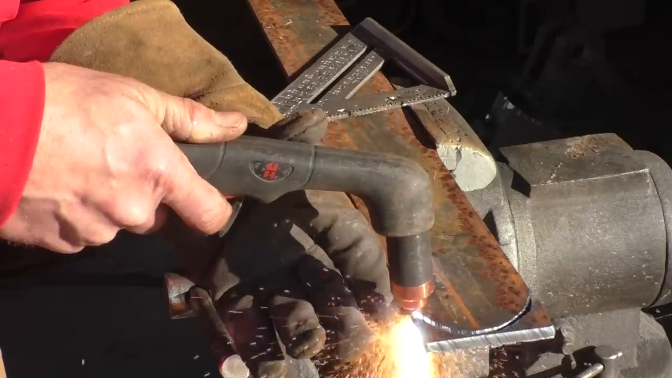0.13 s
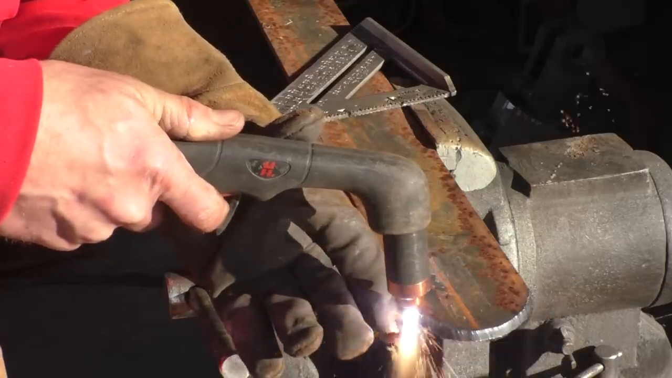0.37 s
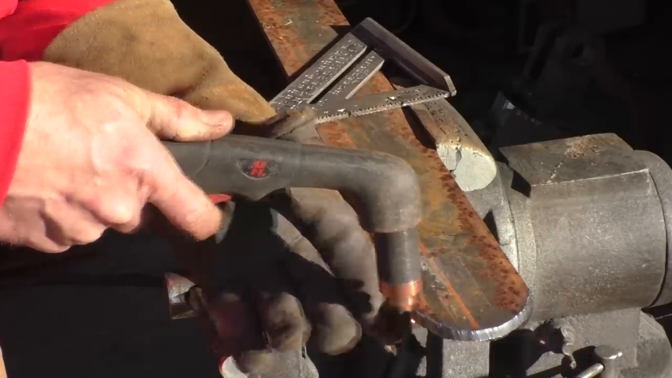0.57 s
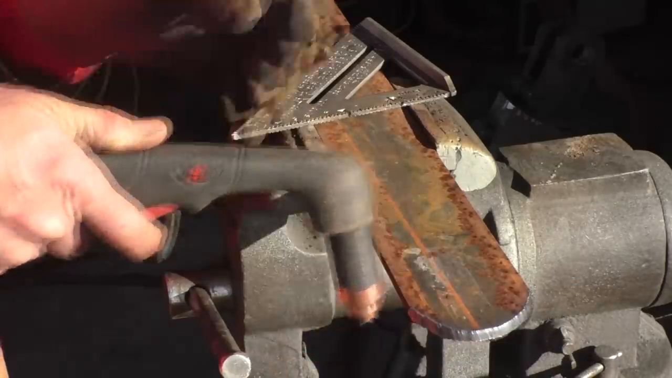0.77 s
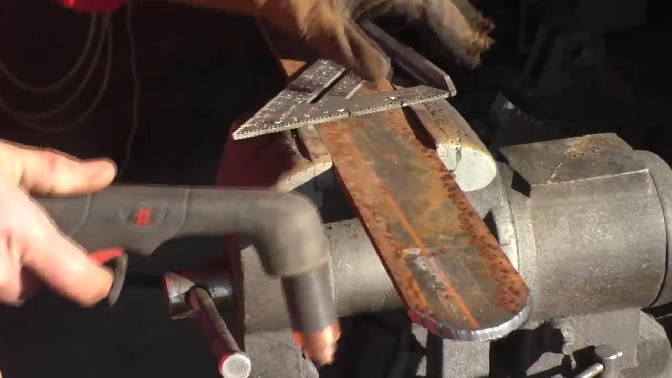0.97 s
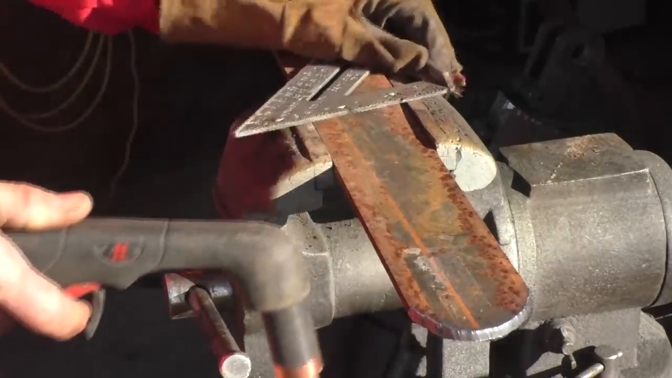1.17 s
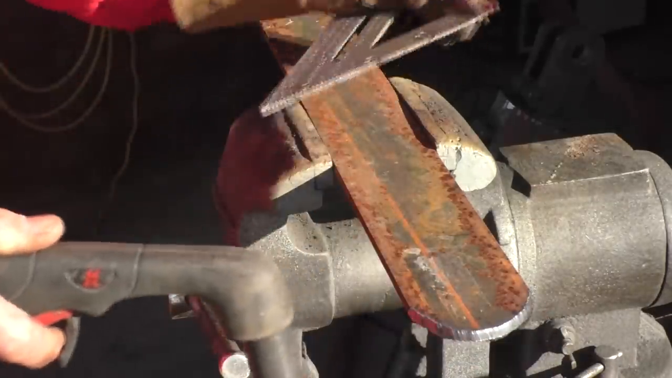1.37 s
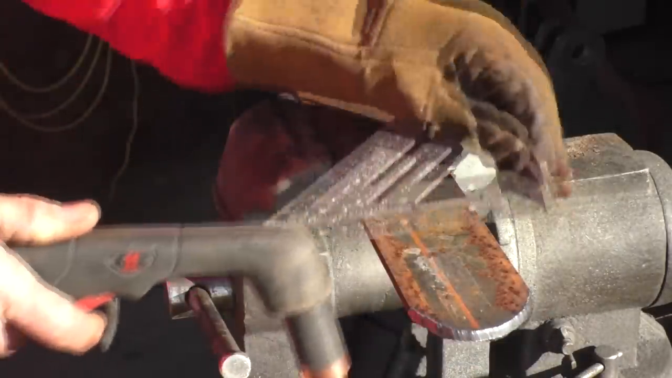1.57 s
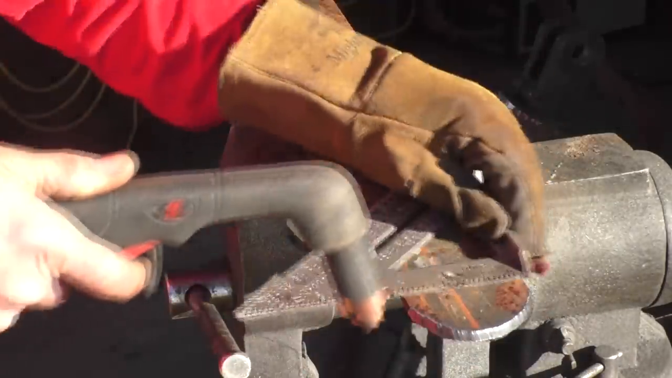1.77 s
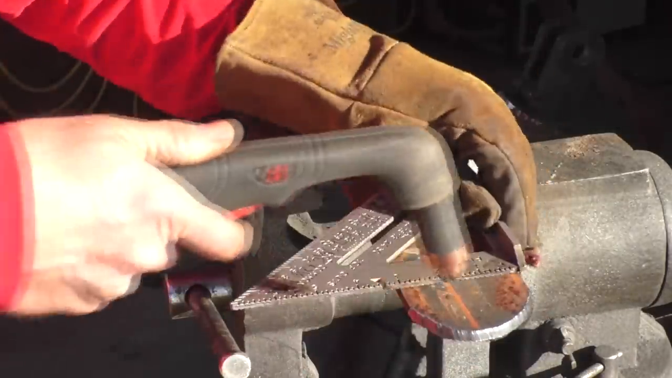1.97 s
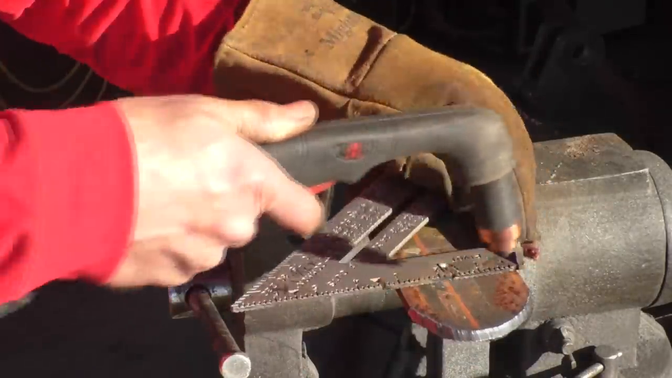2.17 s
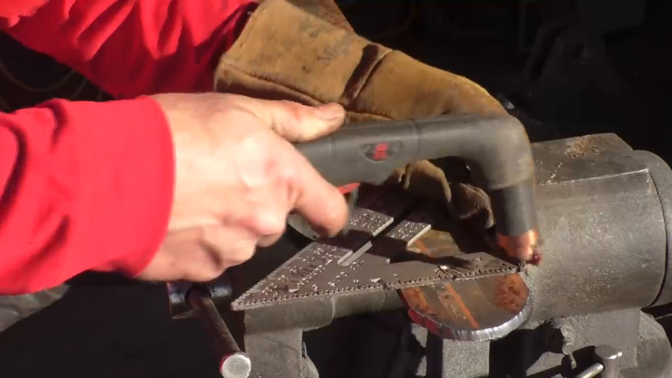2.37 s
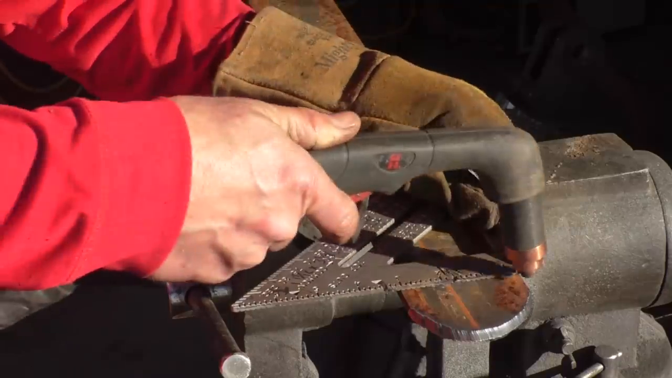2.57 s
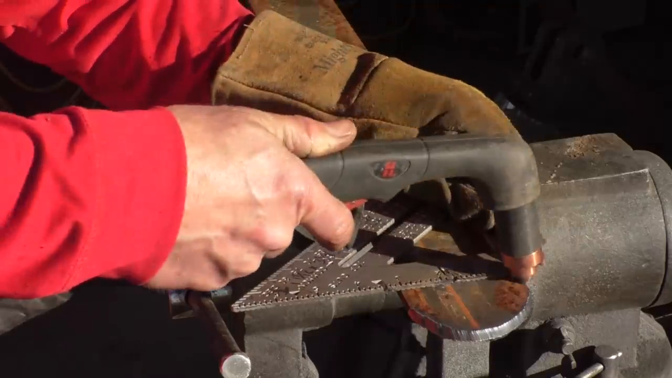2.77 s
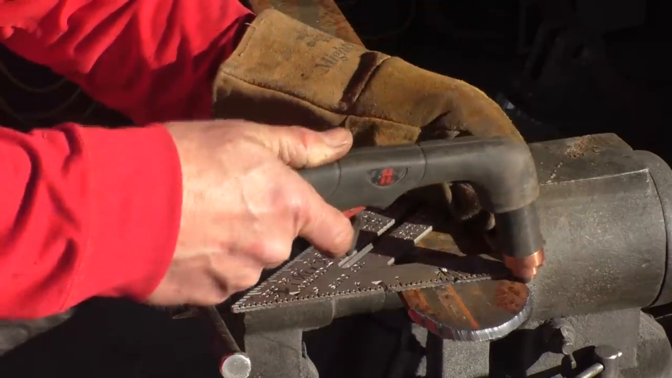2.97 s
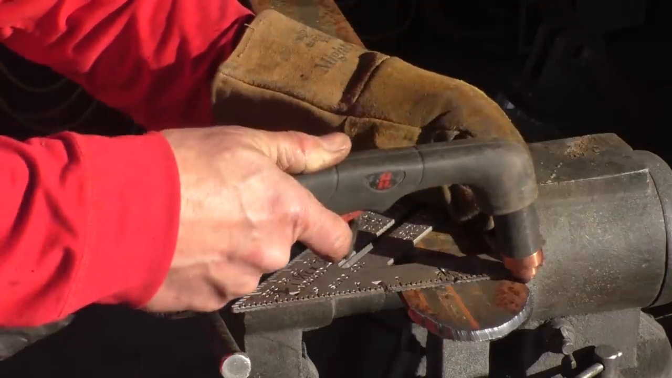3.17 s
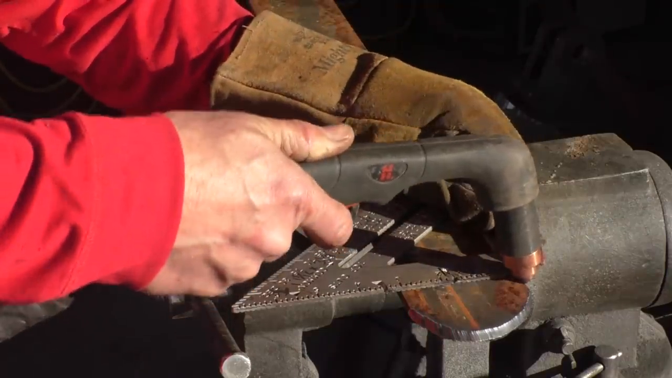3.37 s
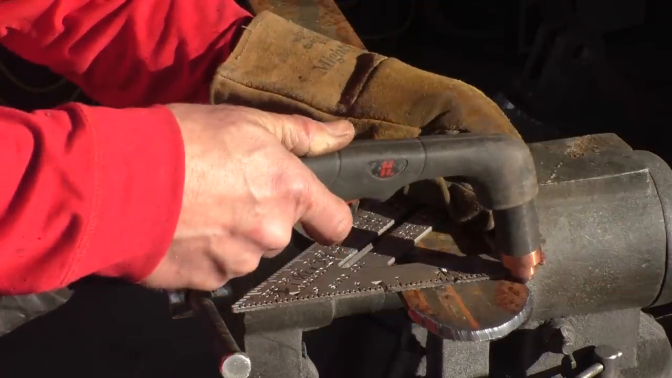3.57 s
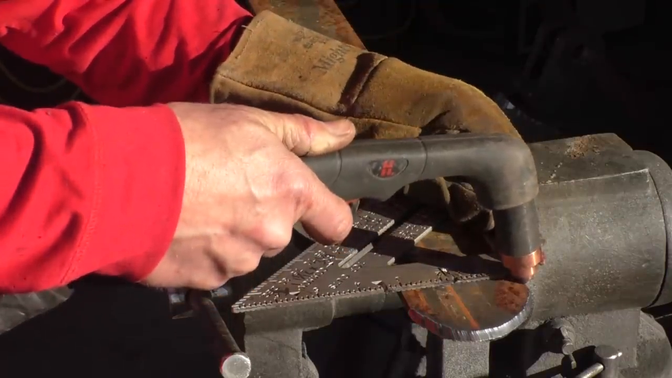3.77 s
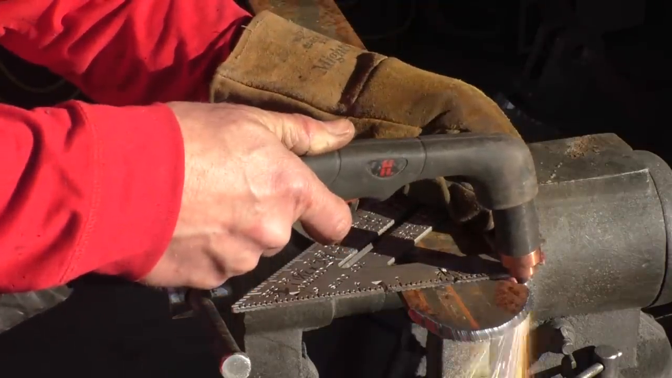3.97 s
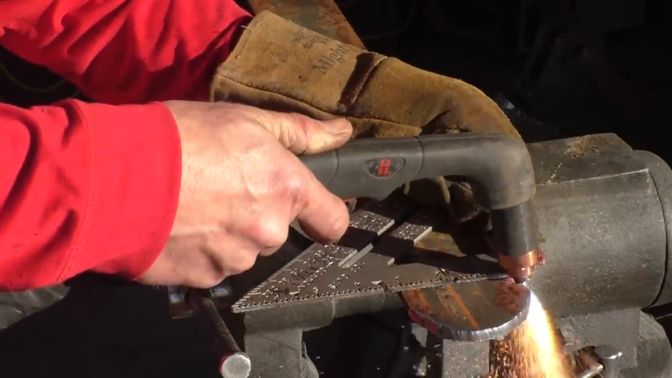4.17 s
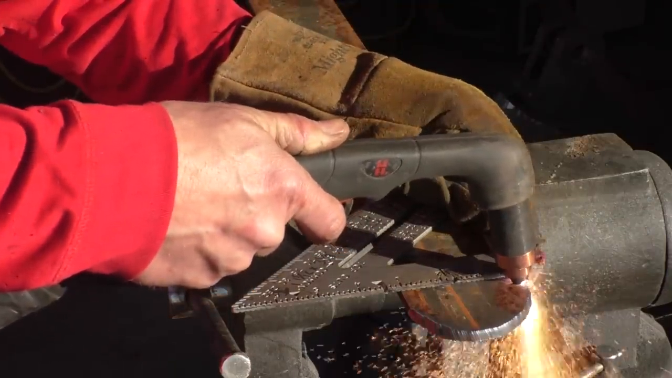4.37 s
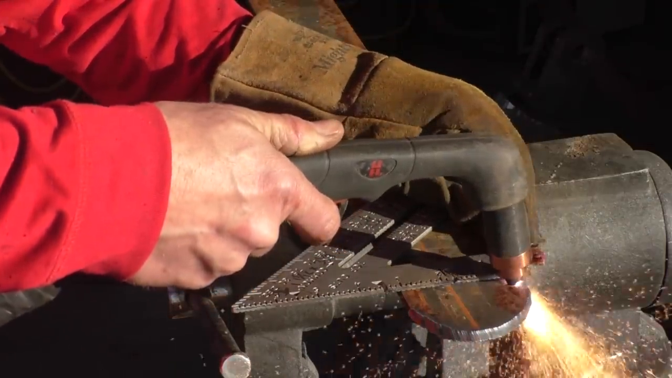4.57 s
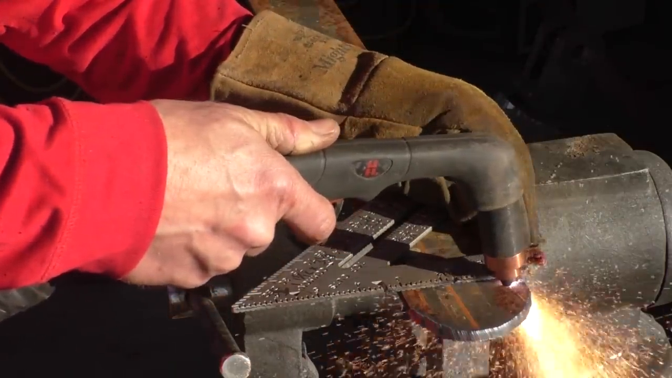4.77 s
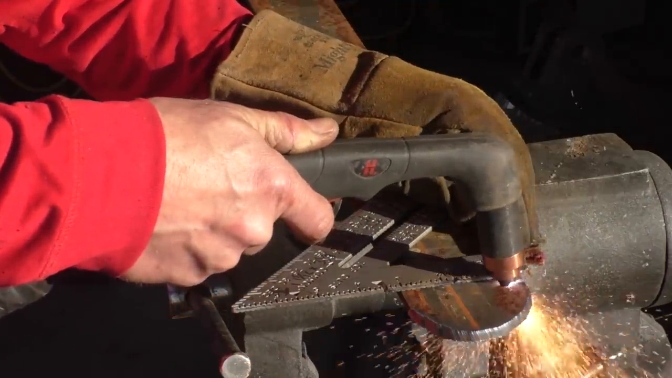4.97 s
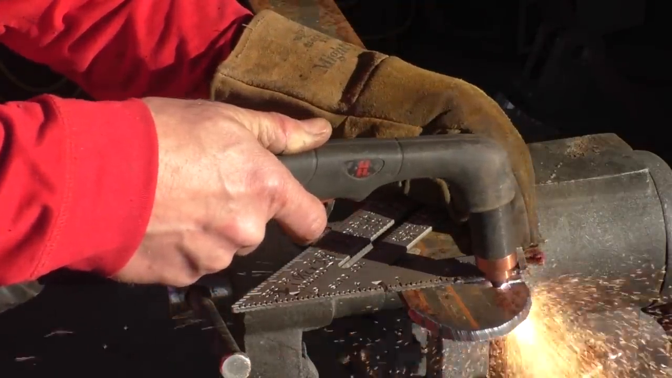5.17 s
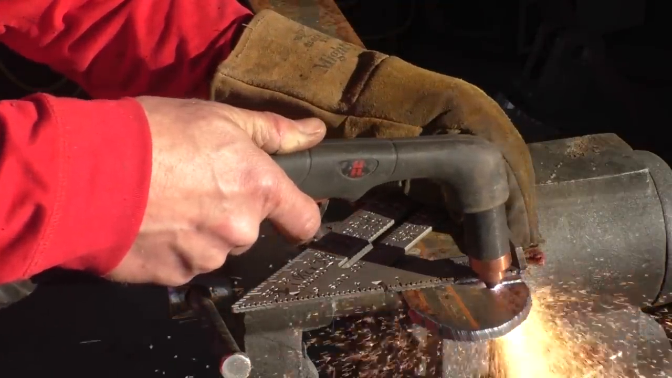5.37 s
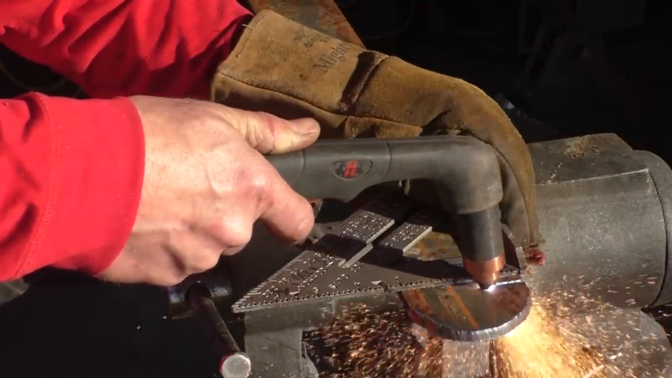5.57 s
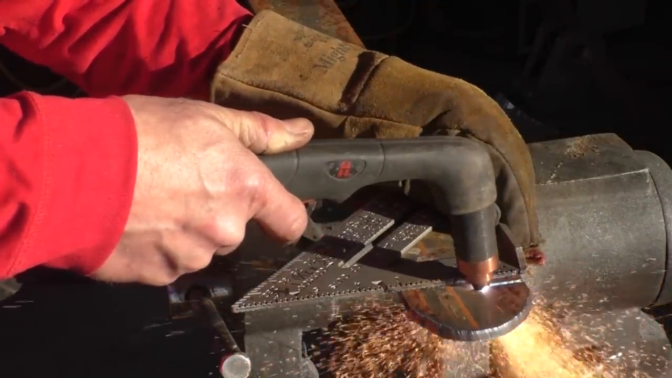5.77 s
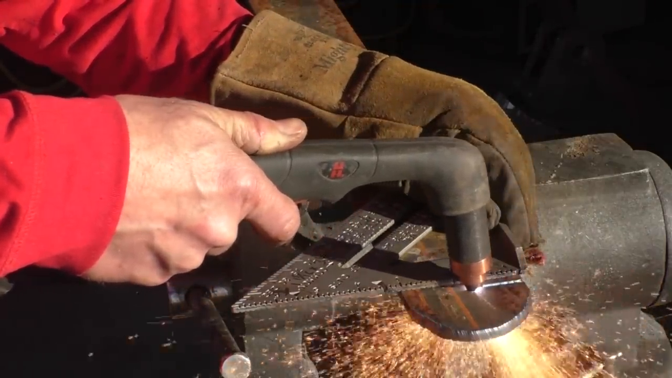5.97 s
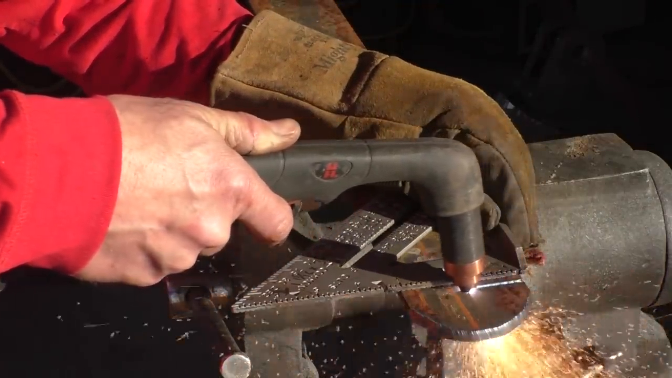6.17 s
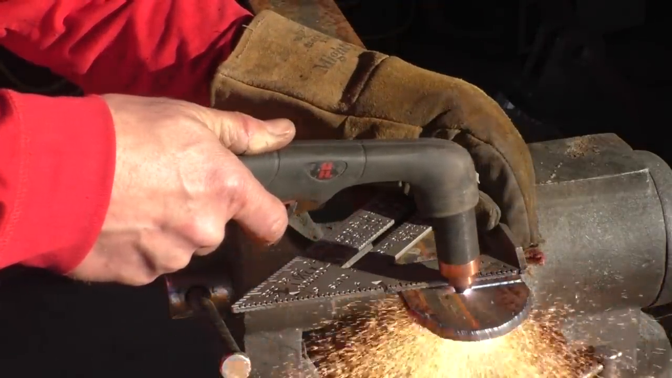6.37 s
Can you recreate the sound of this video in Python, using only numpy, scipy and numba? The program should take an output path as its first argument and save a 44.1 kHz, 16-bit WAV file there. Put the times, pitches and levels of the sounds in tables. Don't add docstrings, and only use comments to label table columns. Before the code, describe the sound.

A plasma torch roars and spits, pops out to hissing air, a metal square clacks down, then the valve shudders and cutting bursts back.

```python
import sys
import numpy as np
from scipy import signal
from scipy.fft import rfft, irfft, next_fast_len
from scipy.io import wavfile
from numba import njit

SR = 44100
rng = np.random.default_rng(int(sys.argv[2]) if len(sys.argv) > 2 else 0)


def attenuation_scalar(level_db):
    decades = np.asarray(level_db, float) / 20
    return 10 ** decades


def unload_wav(signal):
    wavfile.write(
        sys.argv[1],
        SR,
        np.round(np.clip(np.atleast_2d(signal).T, -1, 1) * 32767).astype(np.int16),
    )


N = 282681
SIZE = next_fast_len(N)
TIME = np.arange(N) / SR
HZ = np.arange(SIZE // 2 + 1) * SR / SIZE + 1e-3
TOP_HZ = 15760
ARC_BREAKS_S, ARC_RESTRIKES_S = .669, 4.024
FAN_HZ, RUMBLE_OVER_FAN_DB = 275, 2
SHUT_S, SAG_DB_PER_S = 3.44, 39.5
EMPTY_S, DIE_DB_PER_S = 3.686, 96
UNCHOKED_DULL_DB = 1
LOW_LINGERS, HIGH_FADES, TOP_FADES = 0.42, 0.074, 0.33
REOPEN_S, REOPEN_DB, REFILL_DB_PER_S, REOPEN_DULL_DB = 3.937, -33, 215, 10
TONE_RISE_PER_S = 0.022

# [f/Hz, level/dB per Hz]
FIRST_ROAR_COLOUR = [(24, -57), (40, -34), (147, -24.5), (230, -12.5), (310, -17), (657, -5.5),
                     (1060, -7.5), (1170, -11), (1460, -1), (1790, -7.5), (3870, 0.5), (7420, -11.5),
                     (15700, -12)]
SECOND_ROAR_COLOUR = [(24, -65), (40, -38.5), (230, -14), (487, -10.5), (525, -7), (823, -5.5),
                      (1390, -6.5), (1660, -5), (1970, -7.5), (3870, -5), (8200, -11.5), (13500, -6.5),
                      (15700, -14)]
# [f/Hz, width/Hz, lift/dB]
FIRST_BAR_MODES = [(630, 130, 0.5), (1046, 30, 7), (1500, 42, 3.5), (2030, 190, 5.5), (2940, 55, 2.5),
                   (3330, 78, 0), (3880, 160, 1)]
SECOND_BAR_MODES = [(829, 90, 4), (1060, 40, 4), (1300, 40, 3), (1645, 65, 8.5), (2270, 110, 5),
                    (2620, 40, 4), (3100, 60, 3), (3785, 45, 6.5), (5140, 90, 6)]
# [f/Hz, level/dB per Hz]
RUMBLE_COLOUR = [(12, -41), (20, 8), (65, -2.5), (195, -10), (275, -8.5), (329, -12), (812, -10.5),
                 (1120, -20), (1230, -21), (1500, -21), (1950, -18), (3300, -120)]
# [f/Hz, level/dB against the fan tone]
MOTOR_TONES = [(80, -10.5), (138, -11), (212, -12.5)]
# [t/s, level/dB]
FAN_LEVEL = [(0, -52), (.49, -52.5), (.66, -52.5), (.86, -52.5), (1.78, -38.5), (1.81, -42.5), (1.87, -46),
             (2.6, -46.5), (2.7, -43), (3.44, -39), (3.8, -34.5), (3.94, -32.5), (4.02, -31),
             (4.024, -54.5), (4.4, -56.5), (5.0, -55), (5.25, -54.5), (6.41, -53)]
# [t/s, peak level/dB, f/Hz,
# width/Hz, t60/s]
POP_EVENTS = [(.6678, 2, 650, 800, .05), (.6685, -9, 240, 200, .08), (.6725, -3, 1300, 1200, .11),
              (.797, -19, 1500, 3000, .005), (.685, -16, 550, 700, .45), (1.236, -30, 1135, 25, .05),
              (1.68, -36, 70, 40, .3), (1.7905, -6, 2500, 1800, .09), (1.796, -5, 3000, 700, .06),
              (1.8035, -8, 3800, 3000, .04), (1.8412, -4, 4600, 4500, .04), (2.65, -33, 38, 14, .3),
              (3.453, -19, 150, 70, .1), (3.462, -7, 4200, 3500, .35), (3.465, -10, 1000, 1100, .4),
              (3.815, -27, 45, 25, .12), (3.938, -27, 4500, 1500, .03), (3.9752, -3.5, 2300, 2000, .001),
              (4.0232, -3, 900, 1500, .04), (4.0236, -5, 7000, 9000, .03), (4.024, -21, 150, 120, .06),
              (4.036, -2, 5000, 4000, .0015), (4.138, -5, 1200, 1200, .16)]
# [f/Hz, level/dB per Hz]
HISS_COLOUR = [(180, -35), (300, -16), (315, -24), (418, -17), (1450, -9), (1680, -6), (2120, -7),
               (3910, -1.5), (10000, -10), (13300, -5), (15700, -10)]
# [start t/s, end t/s, f/Hz, width/Hz, lift/dB]
NOZZLE_TONES = [(.7, 2.2, 13000, 1300, 6), (.7, 1.8, 4120, 400, 3), (1.87, 2.05, 4700, 250, 5),
                (2.08, 2.17, 3480, 200, 5), (2.05, 2.6, 1750, 200, 4), (2.25, 2.4, 2550, 200, 5),
                (2.3, 2.75, 4050, 110, 9), (2.65, 3.7, 12050, 300, 7.5), (2.7, 3.65, 13300, 500, 3),
                (2.95, 3.8, 5110, 140, 8.5), (2.7, 3.6, 9200, 250, 4), (3.68, 3.96, 4400, 140, 10)]
# [t/s, louder/dB, duller/dB]
JET_AIM = [
    (1.8, -1, 0),
    (1.87, -1, 3.5),
    (2.06, 1.5, 0),
    (2.13, 8, 6.5),
    (2.2, 5, 6),
    (2.36, 5, -0.5),
    (2.58, 3, -1.5),
    (2.66, -1, -0.5),
    (2.95, -1.5, -1),
]
# [t/s, peak level/dB, dullness/-0.2 to 1]
SQUARE_BLOWS = [
    (1.772, -15, -.2),
    (1.793, -4, .25),
    (1.841, 1, -.1),
    (1.94, -11, .5),
]
# [f/Hz, level/dB, t60/s]
SQUARE_MODES = [(474, -28, .5), (1245, -17, .4), (1264, -17, .35), (1776, -20, .15), (2519, -13, .07),
                (2767, -12, .07), (3009, -10, .05), (3935, -5, .06), (4150, -1, .065), (4667, -11, .05),
                (5100, -12, .04), (5782, -4, .04), (7100, -9, .03)]
# [t/s, level/dB]
SQUARE_SLIDE = [
    (2.06, -40),
    (2.1, -29),
    (2.135, -25),
    (2.15, -26),
    (2.18, -30),
]
# [t/s, f/Hz, level/dB, roughness/0-1]
VALVE_CLOSING = [
    (3.455, 332, -33, 1),
    (3.48, 396, -20, 1.1),
    (3.52, 427.6, -24, 0.75),
    (3.56, 446, -26.5, 0.9),
    (3.62, 460, -34, 0.8),
]
VALVE_OPENING = [
    (3.945, 420, -36, .1),
    (3.948, 420, -16, .1),
    (3.958, 420, -20, .1),
    (3.967, 420, -18, .1),
    (3.971, 420, -28, .5),
    (4.02, 380, -29, .8),
]


def rms_one(x):
    return x / np.sqrt(np.mean(x ** 2) + 1e-20)


def in_time(rows):
    s, *columns = np.transpose(rows)
    gate = np.clip(np.minimum(TIME - s[0], s[-1] - TIME) / .002 + 1, 0, 1)
    return gate, [np.interp(TIME, s, column) for column in columns]


def at_hz(points, hz):
    points = np.array(points)
    return np.interp(np.log(hz), np.log(points[:, 0]), points[:, 1])


def drift(rate):
    r = np.exp(-80 * np.pi * rate / SR)
    slow = signal.lfilter([1], [1, -2 * r, r * r], rng.standard_normal(N // 40 + 2002))[2000:]
    return np.interp(np.arange(N) / 40, np.arange(len(slow)), rms_one(slow))


@njit
def moving_resonance(x, hz, width_hz, sr):
    r = np.exp(-np.pi * width_hz / sr)
    y = np.zeros(len(x))
    for i in range(2, len(x)):
        ring = 2 * r * np.cos(2 * np.pi * hz[i] / sr) * y[i - 1] - r * r * y[i - 2]
        y[i] = (1 - r * r) / 2 * (x[i] - x[i - 2]) + ring
    return y


def turbulence(source, colour, shares_db, mid_hz, patchy_db, shared_db):
    spectrum = rfft(source, SIZE) * attenuation_scalar(at_hz(colour, np.minimum(HZ, 15400)))

    def level(low, high):
        inside = (HZ > low) & (HZ < high)
        return np.sqrt(np.sum(np.abs(spectrum[inside]) ** 2) * 2) / SIZE

    spectrum /= level(*mid_hz)
    ranges = [(mid_hz[0] / 5, mid_hz[0]), (mid_hz[1], 10500), (10500, TOP_HZ)]
    low_db, high_db, top_db = [share - 20 * np.log10(level(*r)) for share, r in zip(shares_db, ranges)]
    treble_db = {25: 0.21 * high_db, 26: high_db, 27: top_db, 28: top_db}
    gust_db = shared_db * (0.23 * drift(15) + 0.84 * drift(18))
    out = np.zeros(N)
    for step in range(10, 29):
        mask = np.cos(np.pi / 2 * np.clip(2 * np.log2(HZ) - step, -1, 1)) ** 2
        lowness = np.clip(np.log2(1.27 * mid_hz[0]) - step / 2, 0, 1)
        share_db = treble_db.get(step, lowness * low_db)
        out += irfft(spectrum * mask, SIZE)[:N] * attenuation_scalar(share_db + gust_db + patchy_db * drift(19))
    return out


def arc(start_s, end_s, roar_db, shares_db, widen_db_per_s, colour, bar, spit_per_s, spit_db):
    gate, (burnt_s,) = in_time([(start_s, 0), (end_s, end_s - start_s)])
    shares_db = [db + widen_db_per_s * burnt_s for db in shares_db]
    spit_sizes = attenuation_scalar(2.8 * np.minimum(rng.exponential(1, N), 4)) * rng.choice([-1, 1], N)
    spits = (rng.random(N) < spit_per_s / SR) * spit_sizes
    source = rng.standard_normal(N) + attenuation_scalar(spit_db) * spits
    roar = turbulence(source, colour, shares_db, (2000, 6500), patchy_db=0.6, shared_db=0.5)
    for hz, width_hz, lift_db in bar:
        ring = moving_resonance(roar, np.full(N, float(hz)), float(width_hz), SR)
        roar = roar + (attenuation_scalar(lift_db + 1.4 * drift(9)) - 1) * ring
    return gate * attenuation_scalar(roar_db) * roar


def yard():
    hum = attenuation_scalar(1.2 * drift(16)) * np.sin(2 * np.pi * FAN_HZ * TIME + 1.4 * drift(0.87))
    for hz, level_db in MOTOR_TONES:
        hum += attenuation_scalar(level_db + 0.76 * drift(8.5)) * np.sin(2 * np.pi * hz * TIME + 2.1 * drift(2.7))
    spectrum = rfft(rng.standard_normal(N), SIZE) * attenuation_scalar(at_hz(RUMBLE_COLOUR, HZ))
    rumble = rms_one(irfft(spectrum, SIZE)[:N])
    return np.sqrt(2) * hum + attenuation_scalar(RUMBLE_OVER_FAN_DB + 1.5 * drift(4)) * rumble


def walls(x):
    response = np.zeros(int(.06 * SR))
    lags_s = rng.uniform(.002, .035, 14)
    response[(lags_s * SR).astype(int)] = attenuation_scalar(-15 - 260 * lags_s) * rng.choice([-1, 1], 14)
    response = signal.lfilter([.6], [1, -.4], response)
    response[0] = 1
    return signal.fftconvolve(x, response / np.linalg.norm(response))[:N]


def stray_treble(mono):
    side, fade = np.zeros(N), np.hanning(2048)
    for when, where in rng.random((32, 2)):
        i = int(when * (N - 2048))
        low_hz = 4200 + where * (14300 - 4200)
        band = signal.butter(8, [low_hz, low_hz + 1500], "band", fs=SR, output="sos")
        heard, noise = signal.sosfilt(band, [mono[i:i + 2048], rng.standard_normal(2048)])
        side[i:i + 2048] += fade * rms_one(noise) * heard.std() * attenuation_scalar(-2.5)
    return side * [[1], [-1]]


def pops():
    out, age = np.zeros(N), np.arange(12000) / SR
    for s, peak_db, hz, width_hz, t60 in POP_EVENTS:
        puff = rng.standard_normal(len(age)) * attenuation_scalar(-60 * age / t60)
        puff[:3] += 2.2
        for _ in range(2):
            puff = moving_resonance(puff, np.full(len(age), float(hz)), 1.5 * width_hz, SR)
        i = int(s * SR)
        out[i:i + len(age)] += attenuation_scalar(peak_db) * puff / np.abs(puff).max()
    return out


def jet():
    _, (louder_db, duller_db) = in_time(JET_AIM)
    before = TIME < REOPEN_S
    sag_db = SAG_DB_PER_S * np.maximum(TIME - SHUT_S, 0)
    lost_db = before * (sag_db + DIE_DB_PER_S * np.maximum(TIME - EMPTY_S, 0))
    refill_db = np.minimum(REOPEN_DB + REFILL_DB_PER_S * (TIME - REOPEN_S), 0)
    louder_db = np.where(before, louder_db - lost_db, refill_db)
    duller_db = np.where(before, duller_db + UNCHOKED_DULL_DB * (TIME > EMPTY_S), REOPEN_DULL_DB)
    low_db = -11 + LOW_LINGERS * lost_db
    high_db = -6.5 - duller_db - HIGH_FADES * lost_db
    top_db = -5 - duller_db - TOP_FADES * lost_db
    hiss = turbulence(rng.standard_normal(N), HISS_COLOUR, (low_db, high_db, top_db), (2500, 6500),
                      patchy_db=0.52, shared_db=0.98)
    for start, end, hz, width_hz, lift_db in NOZZLE_TONES:
        along = np.clip((TIME - start) / (end - start), 0, 1)
        glide_hz = hz * (1 + TONE_RISE_PER_S * (along - .5) * (end - start))
        swell_db = lift_db * np.minimum(1, 1.8 * np.sin(np.pi * along))
        hiss = hiss + (attenuation_scalar(swell_db) - 1) * moving_resonance(hiss, glide_hz, float(width_hz), SR)
    flowing = np.clip((TIME - ARC_BREAKS_S) / .01, 0, 1) * (TIME < ARC_RESTRIKES_S)
    return flowing * attenuation_scalar(23.5 + louder_db) * hiss


def square():
    s, peak_db, dull = np.transpose(SQUARE_BLOWS)
    gate, (slide_db,) = in_time(SQUARE_SLIDE)
    grit = gate * attenuation_scalar(slide_db - 25) * (rng.random(N) < 900 / SR) * rng.standard_normal(N)
    scatter_db = rng.normal(0, 1.5, (len(s), len(SQUARE_MODES)))
    out = np.zeros(N)
    for k, (hz, level_db, t60) in enumerate(SQUARE_MODES):
        clicks = grit + 1e-18
        blow_db = peak_db - 8 + scatter_db[:, k] - 9 * dull * np.log2(hz / 1500)
        clicks[(s * SR).astype(int)] += attenuation_scalar(blow_db)
        r, w = attenuation_scalar(-60 / (t60 * SR)), 2 * np.pi * hz / SR
        out += attenuation_scalar(level_db) * signal.lfilter([0, np.sin(w)], [1, -2 * r * np.cos(w), r * r], clicks)
    thin_plate = signal.butter(2, 380, "high", fs=SR, output="sos")
    return signal.sosfilt(thin_plate, out)


def valve(rows):
    gate, (hz, level_db, rough) = in_time(rows)
    rough = np.clip(rough, 0, 1)
    cycle = np.sin(2 * np.pi * np.cumsum(hz) / SR)
    noise = rms_one(moving_resonance(rng.standard_normal(N), hz, 120., SR))
    air = rms_one(moving_resonance(rng.standard_normal(N), 2.6 * hz, 1800., SR))
    puffs = air * (1 + cycle) * attenuation_scalar(-21)
    return gate * attenuation_scalar(level_db) * (np.sqrt(2 - 2 * rough) * cycle + np.sqrt(rough) * noise + puffs)


def scene():
    cuts = arc(0, ARC_BREAKS_S, roar_db=38.5, shares_db=(-7, -8.5, -5.5), widen_db_per_s=-0.5,
               colour=FIRST_ROAR_COLOUR, bar=FIRST_BAR_MODES, spit_per_s=270, spit_db=-5.0)
    cuts += arc(ARC_RESTRIKES_S, 6.41, roar_db=35.5, shares_db=(-10, -8, -4.5), widen_db_per_s=1.5,
                colour=SECOND_ROAR_COLOUR, bar=SECOND_BAR_MODES, spit_per_s=180, spit_db=4.5)
    _, (gain_db,) = in_time(FAN_LEVEL)
    lasting = attenuation_scalar(gain_db) * (walls(cuts + jet()) + yard())
    mono = lasting + pops() + square() + valve(VALVE_CLOSING) + valve(VALVE_OPENING)
    return np.array([mono, mono])


def low_pass(x):
    return signal.sosfilt(signal.butter(12, 16860, fs=SR, output="sos"), x)


def record(dry):
    heard = signal.sosfilt(signal.butter(2, 42, "high", fs=SR, output="sos"), dry)
    clipped = np.clip(heard + stray_treble(heard[0]), -1, 1)
    mix = signal.sosfilt(signal.ellip(12, .3, 90, TOP_HZ, fs=SR, output="sos"), clipped)
    return low_pass(mix)


dry = scene()
out = record(dry)
unload_wav(out)
```